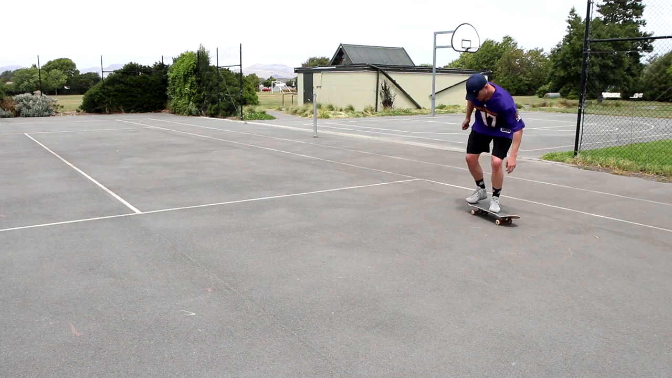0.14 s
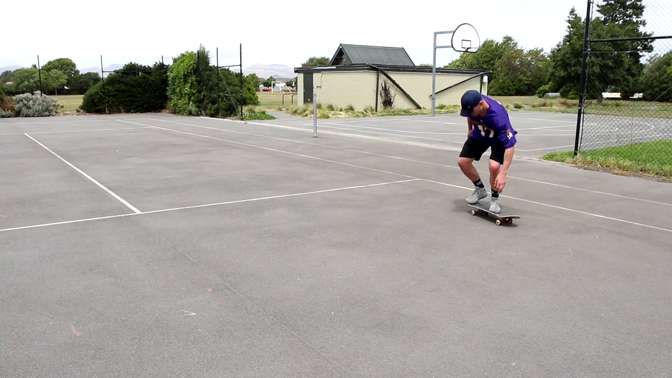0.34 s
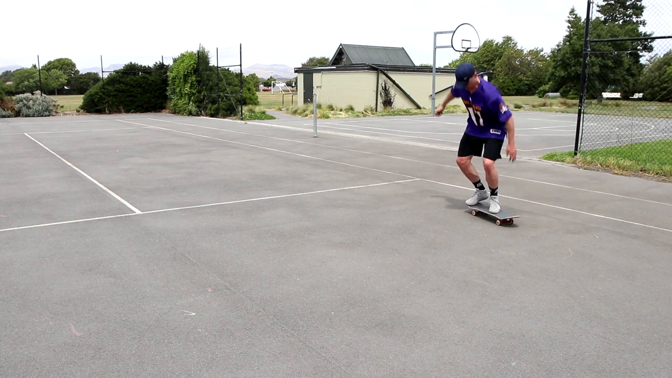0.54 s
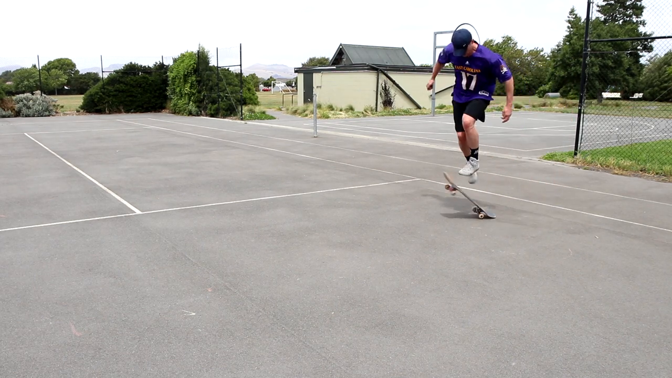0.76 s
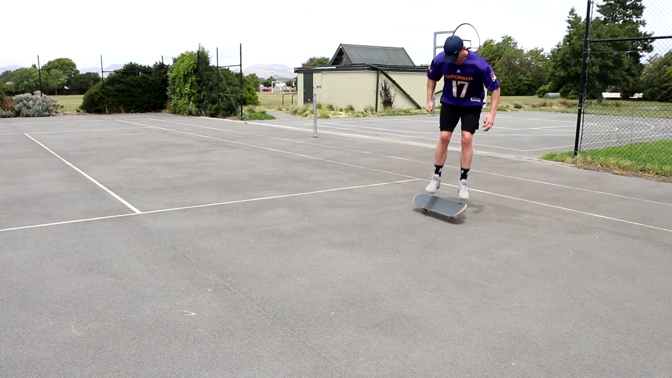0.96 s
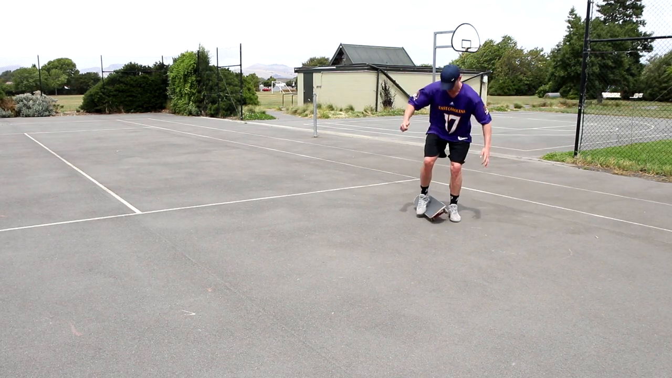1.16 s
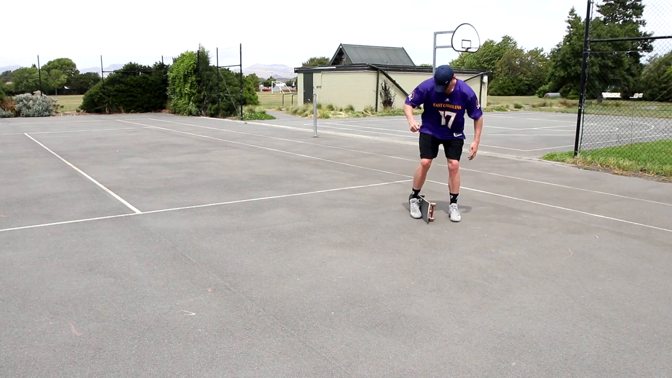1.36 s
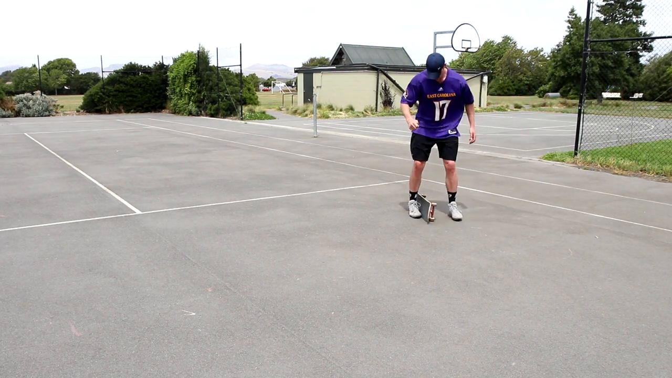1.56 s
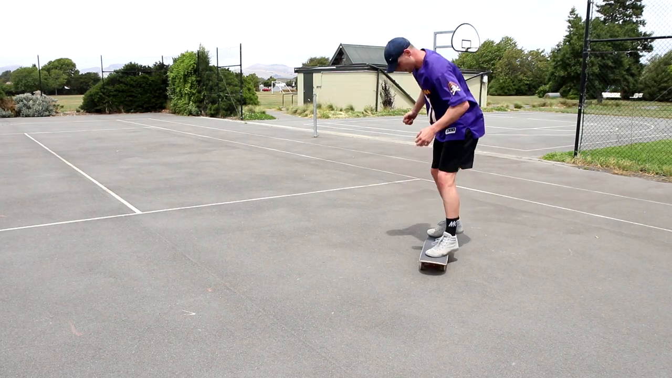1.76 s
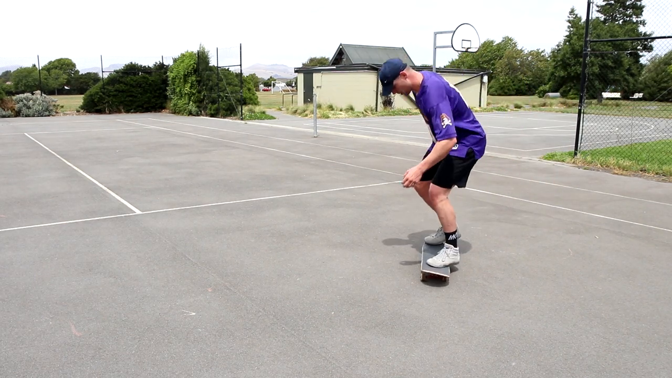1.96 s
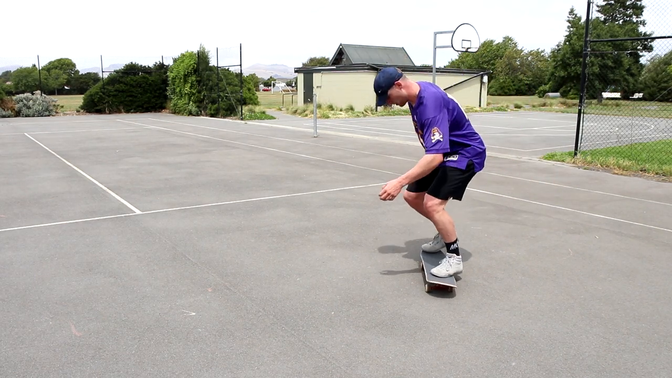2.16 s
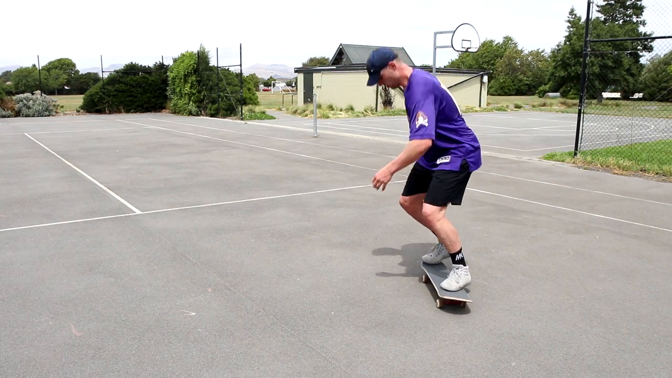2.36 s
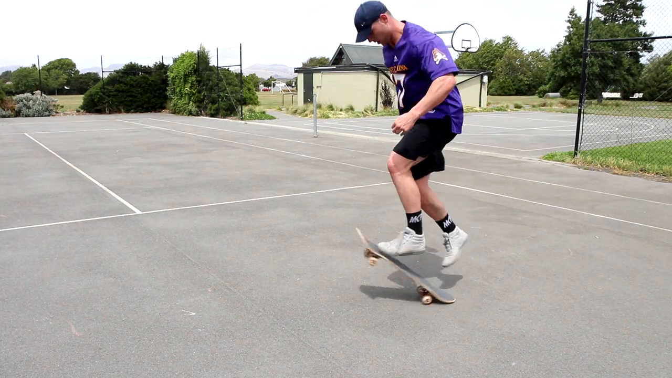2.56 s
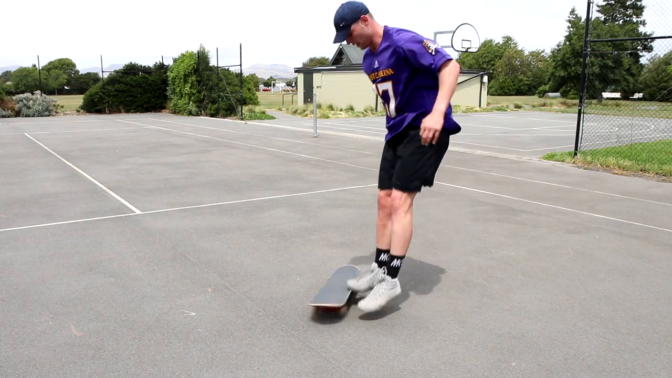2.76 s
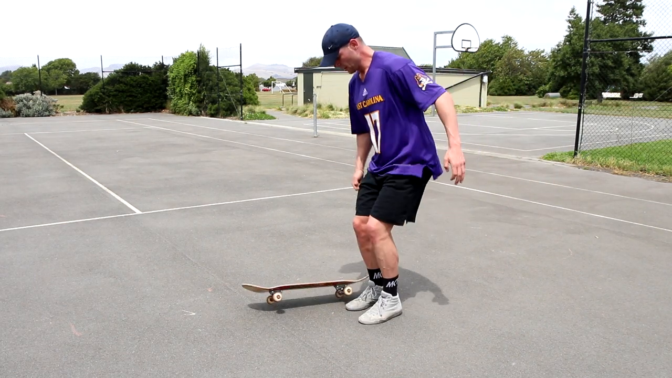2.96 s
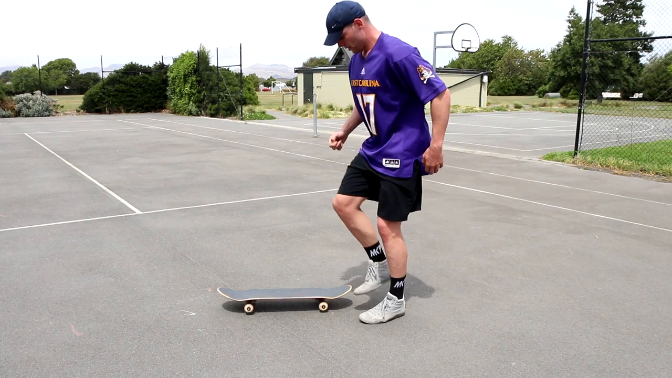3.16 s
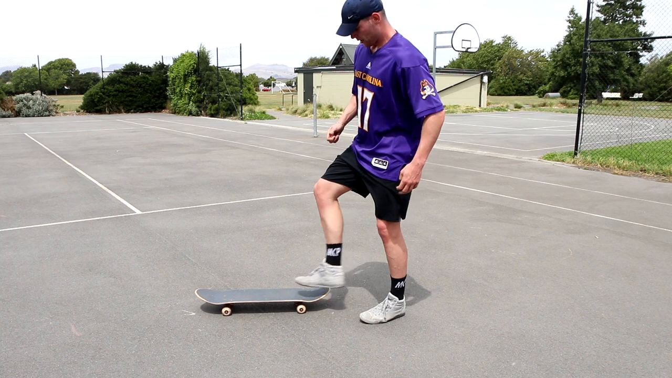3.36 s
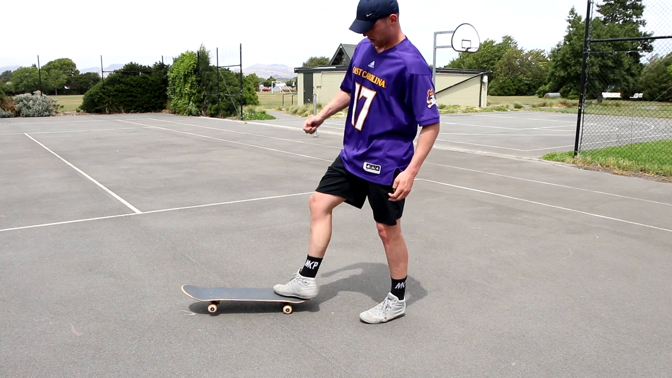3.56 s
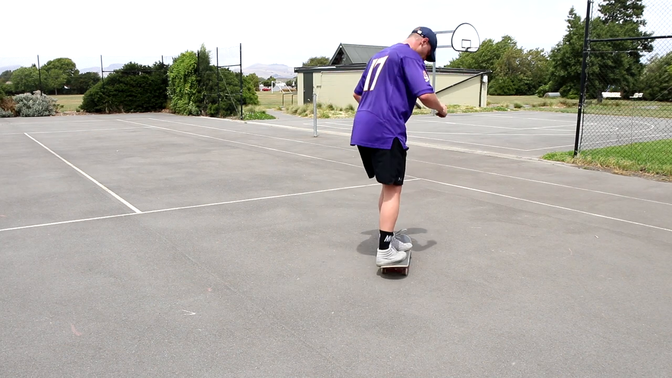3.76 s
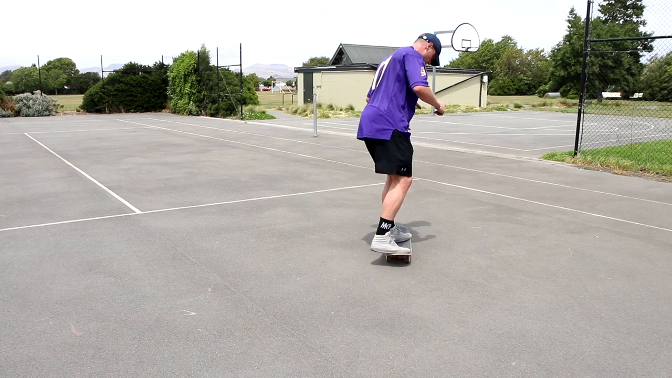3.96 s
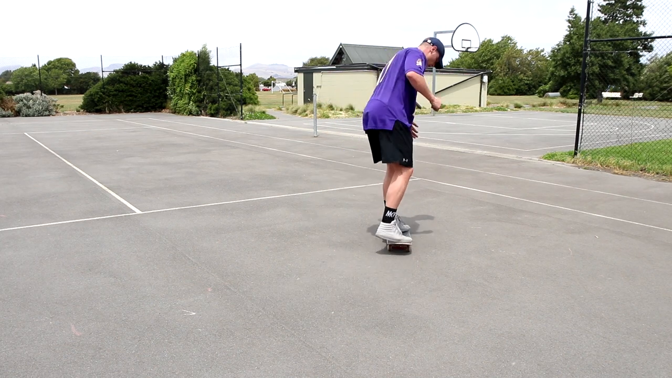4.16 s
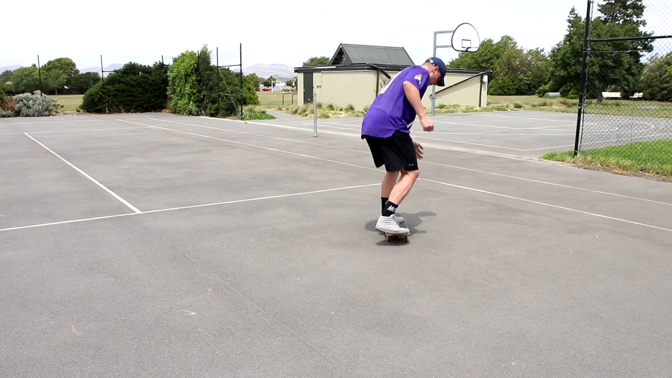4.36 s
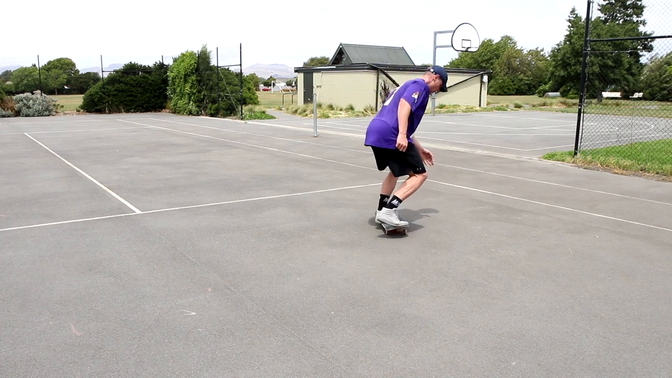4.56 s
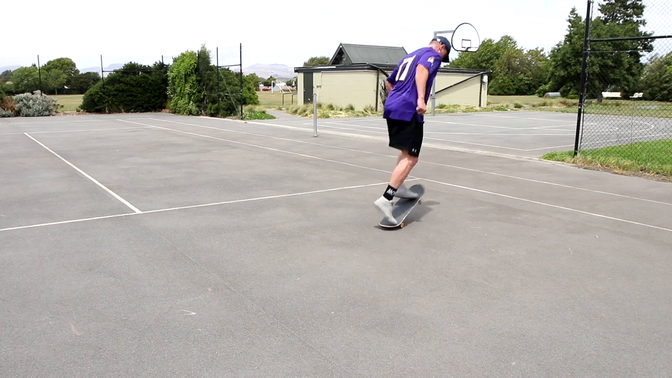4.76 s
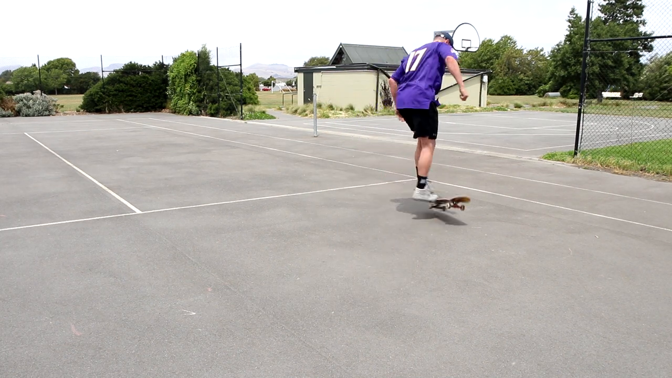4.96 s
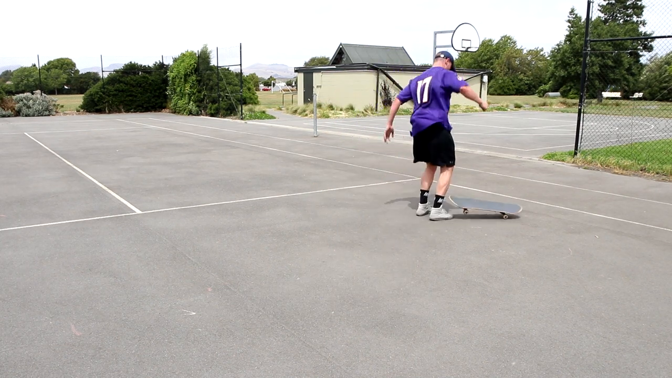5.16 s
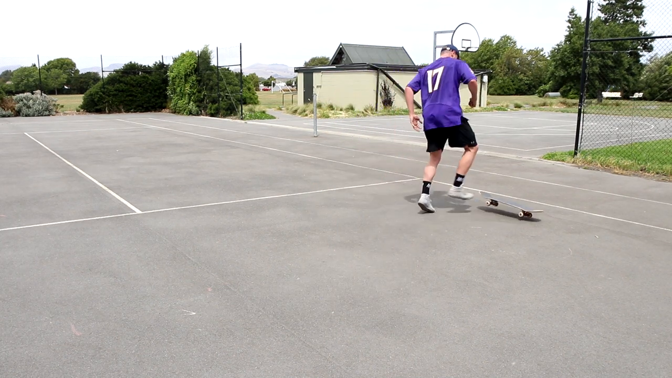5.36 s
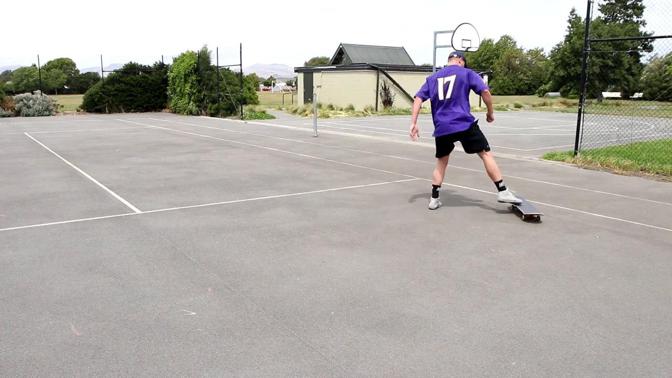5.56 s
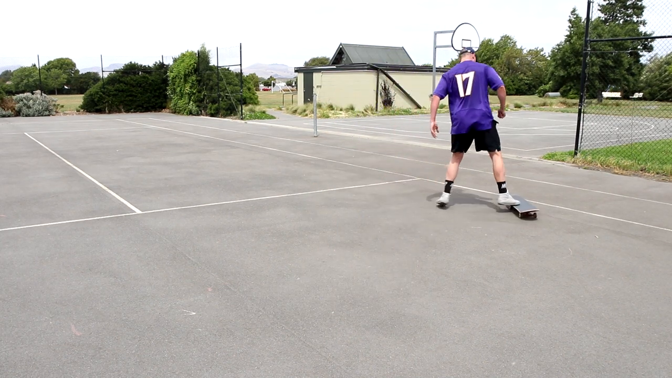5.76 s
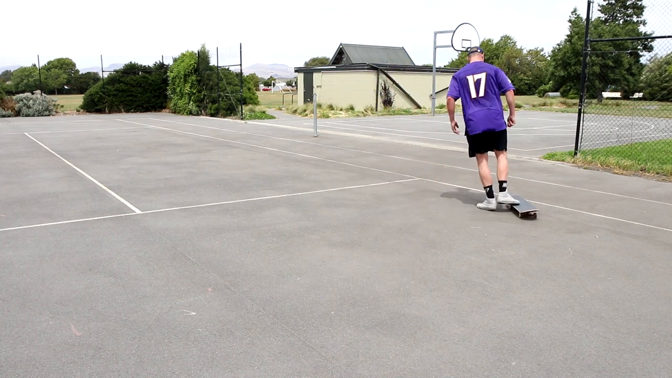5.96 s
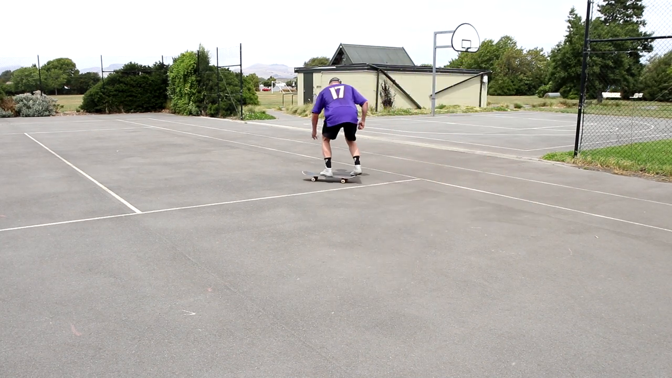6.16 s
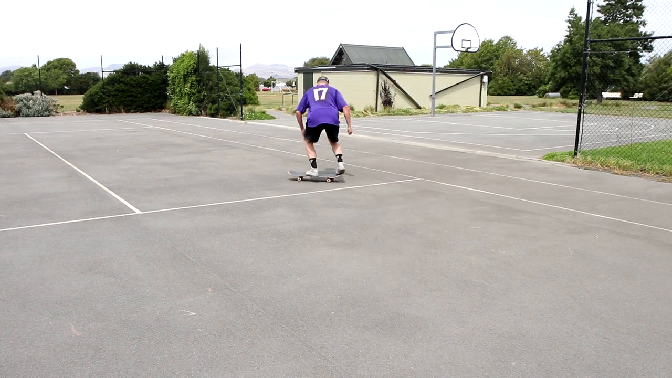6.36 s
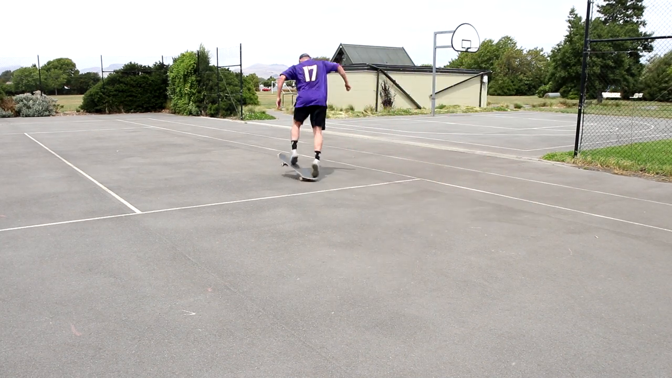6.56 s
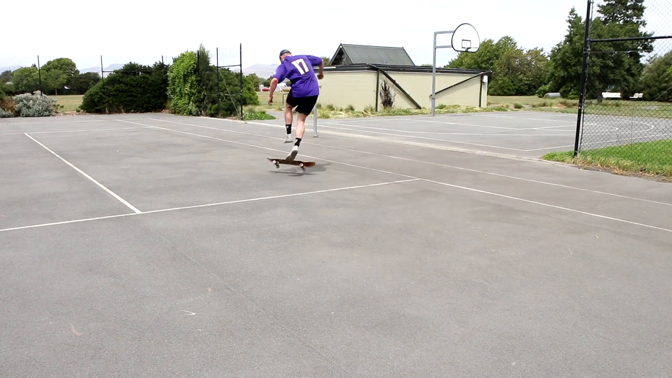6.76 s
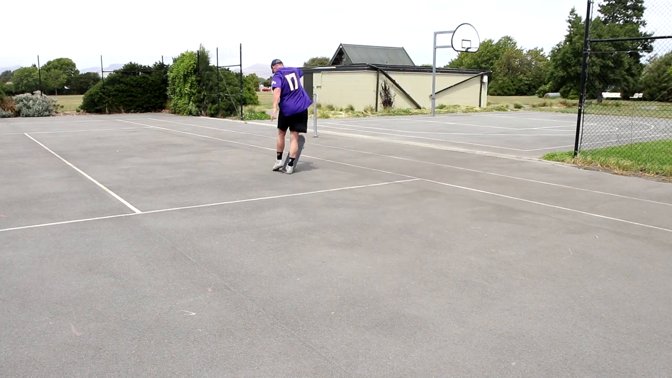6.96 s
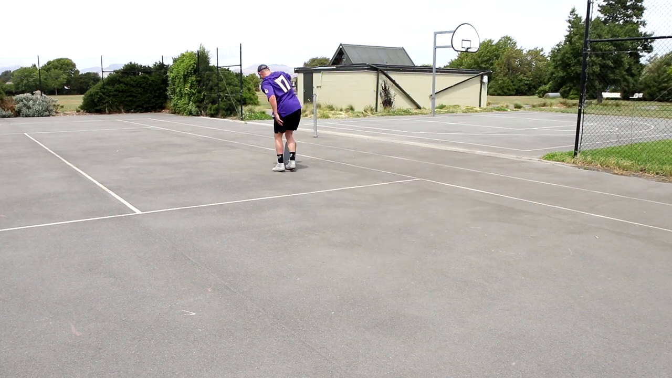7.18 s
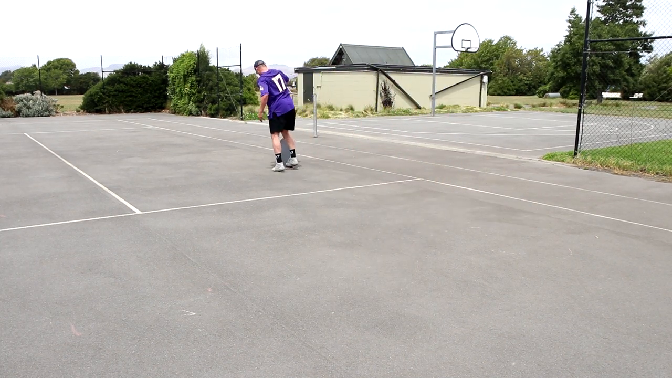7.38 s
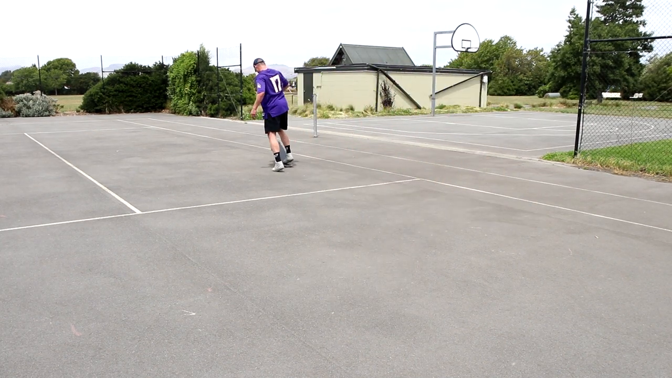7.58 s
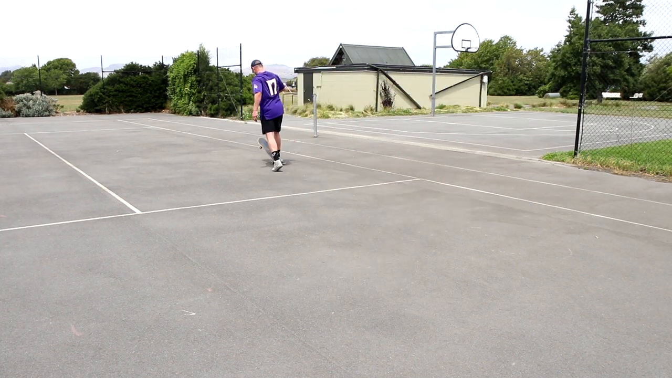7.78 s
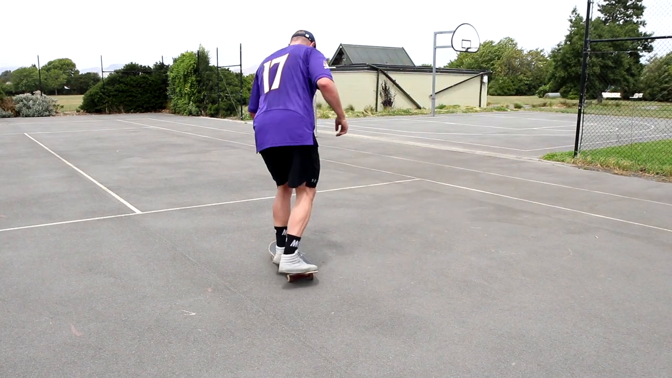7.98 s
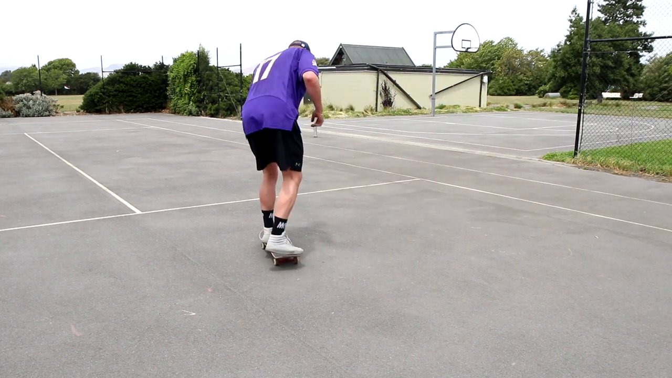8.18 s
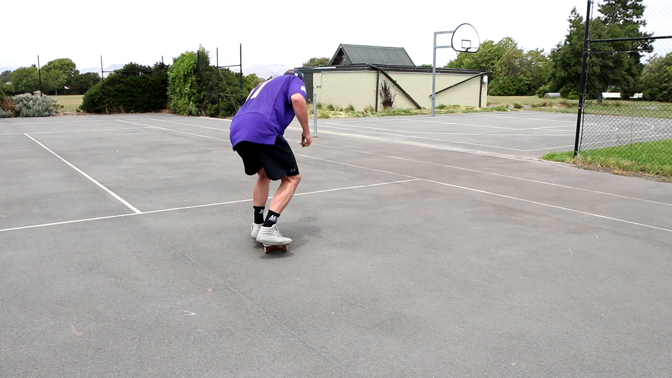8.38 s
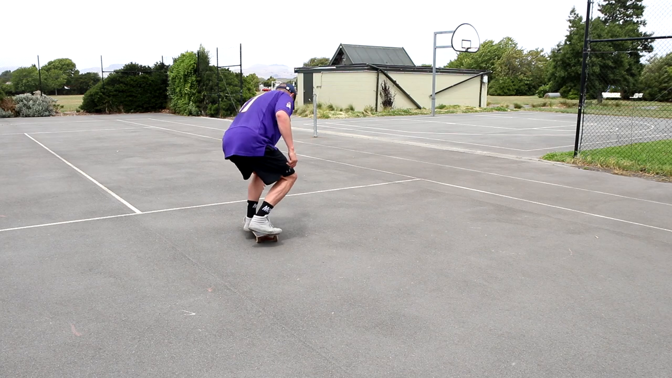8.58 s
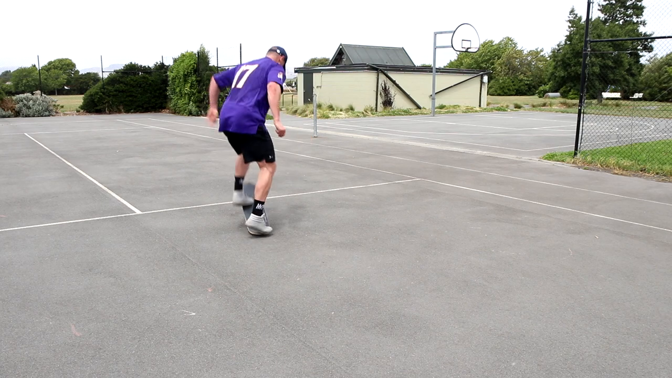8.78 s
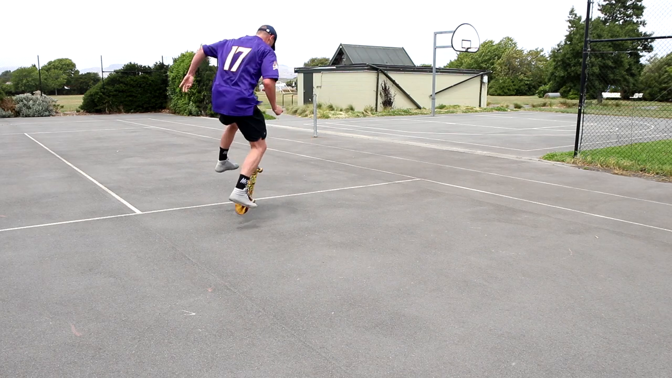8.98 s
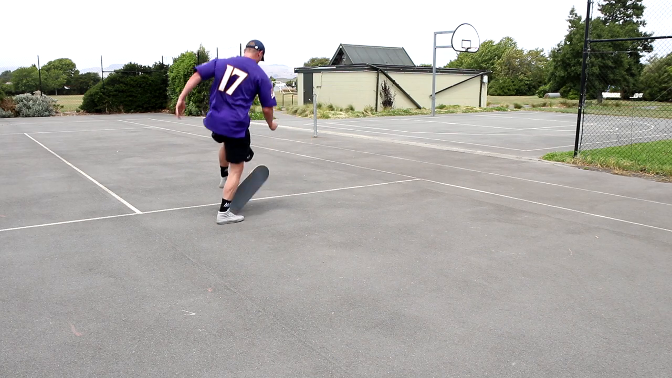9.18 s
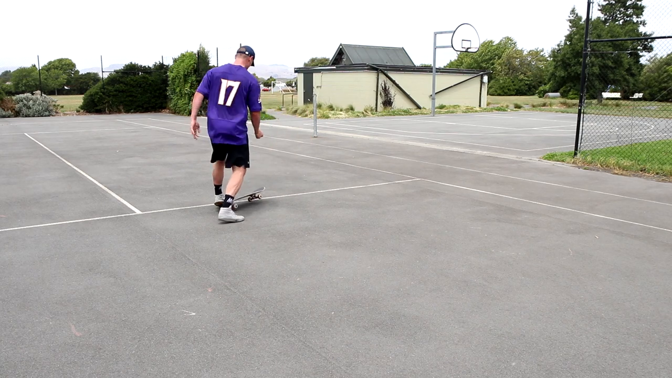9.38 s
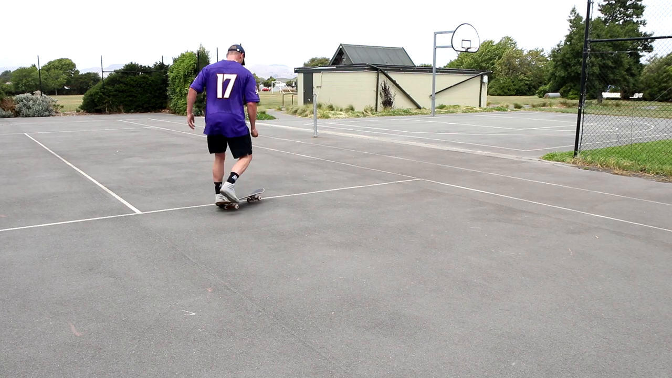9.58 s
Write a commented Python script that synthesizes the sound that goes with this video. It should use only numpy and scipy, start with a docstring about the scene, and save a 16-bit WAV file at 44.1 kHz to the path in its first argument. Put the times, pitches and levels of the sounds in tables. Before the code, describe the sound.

Outdoor asphalt court, one mono microphone, nearly dry, with soft hedge rustle and low wind thumps. Faint rolling opens; scuffs lead to a loud wooden pop at 0.8 seconds, then a cluster of slaps at 0.9-1.2 and juddering wheels to 1.5. After a tiny dip at 1.7, wheels rumble and scrape through gusts; a hard pop at 2.8, clattering landing at 3.0-3.3, and a thin bearing whirr at 3.5. From 3.8 quieter rolling under strong, fluttering wind that briefly hums near 4.6; crack at 5.1, slaps at 5.3, judder at 5.6. From 6.1 rolling resumes, with a very loud pop at 6.9, rapid clacks to 7.3, a scuff at 7.4 and a faint falling bird whistle at 7.6. From 7.8 the fullest wheel rumble, stone snaps at 8.0 and 8.2, a pop at 8.9, slaps at 9.2-9.4 and a last clack at 9.6.

```python
"""On an open asphalt court, a skateboarder tries five kickflips, with short dips in level between attempts.
The board's blows ring the wood; its wheels are a drumming and a hiss, with grit ticks and a spinning bearing.
Shoes and deck scrape, small stones snap and a far bird whistles once, with a faint echo from the court.
Hedges rustle as shaped noise. Gusts buffet the single microphone, which overloads on the hardest blows."""
import sys
import numpy as np
from scipy import signal
from scipy.fft import rfft, irfft, next_fast_len
from scipy.io import wavfile
from scipy.ndimage import map_coordinates

SR = 44100
rng = np.random.default_rng(int(sys.argv[2]) if len(sys.argv) > 2 else 0)


def unload_audio(sound):
    """Save the sound as a 16-bit wav file, at the path given as the first command line argument."""
    columns = np.transpose(np.atleast_2d(sound))
    # keep every value between -1 and 1, then stretch to whole-number steps
    steps = np.round(np.clip(columns, -1, 1) * 32767)
    wavfile.write(sys.argv[1], SR, steps.astype(np.int16))


N = 424683  # length in samples

# A tip or edge of the board clacks on the asphalt. Each row: time in seconds, level in dB,
# ring centre in Hz, wooden knock in dB, hard crack in dB (knock and crack are relative).
CLACKS = [(0.089, -21, 1490, -12, -9.5), (0.809, -4.5, 1950, -16.5, -11), (1.066, -19.5, 2500, -20, -23),
          (2.82, -2.5, 1610, -27, -24), (2.847, -3.5, 1230, -46, -17.5), (3.106, -9, 1860, -12.5, -13.5),
          (3.142, -4.5, 1460, -22, -6.5), (3.21, -12, 1340, -12, -5), (3.344, -20.5, 1400, -26, -2),
          (5.103, -3.5, 930, -35, -5.5), (5.158, -8, 790, -15, -8), (6.871, 0, 814, -7, -16.5),
          (7.026, -2.5, 1900, -16.5, -7.5), (7.126, -6.5, 2270, -31, -34), (7.18, -14, 3700, -12, -39),
          (8.875, -4, 1700, -5, -9), (9.56, -7.5, 1050, -37, -14.5)]
CLACK_T60 = 0.026  # seconds for the chatter to fall 60 dB
# The board slaps down flat. Each row: time in seconds, level in dB, hard crack in relative dB.
SLAPS = [(0.933, -15.5, -8.5), (1.008, -4, -15), (1.107, -4, -6), (1.17, -11.5, -13.5), (2.987, -9, -9),
         (5.329, -9, -10.5), (5.368, -12.5, -1), (6.966, -6.5, -17.5), (7.09, -10, -23), (7.269, -9, -23.5),
         (9.197, -17, -11), (9.269, -3, -16.5), (9.364, -5.5, -1.5)]
SLAP_KNOCK_DB, SLAP_T60, SLAP_HZ = -2, 0.047, 1245  # relative dB, seconds, ring centre in Hz
# Wheels and trucks judder over the ground. Each row: time in seconds, level in dB, ring centre in Hz.
JUDDERS = [(1.127, -10, 765), (1.391, -9, 900), (1.456, -8.5, 1170), (1.492, -9.5, 1260),
           (2.786, -13, 1960), (2.799, 2, 1510), (2.876, -16.5, 1570), (3.16, -5, 2020), (3.271, -5, 2220),
           (3.309, -18, 1800), (4.267, -21.5, 1600), (4.319, -20, 1800), (4.341, -15, 1700),
           (5.624, -2.5, 1370), (5.652, -8.5, 1500), (5.701, -14.5, 1560), (5.73, -20, 1590),
           (6.641, -7.5, 1060), (7.499, -12, 915), (8.304, -10.5, 1430), (8.775, -8, 1340),
           (9.608, -17, 1480)]
JUDDER_KNOCK_DB, JUDDER_CRACK_DB, JUDDER_T60 = -16.5, -18.5, 0.081  # relative dB twice, seconds


def contacts():
    """List every blow as (seconds, level dB, knock dB, crack dB, chatter t60 seconds, ring centre Hz)."""
    clacks = [(s, db, knock, crack, CLACK_T60, hz) for s, db, hz, knock, crack in CLACKS]
    slaps = [(s, db, SLAP_KNOCK_DB, crack, SLAP_T60, SLAP_HZ) for s, db, crack in SLAPS]
    judders = [(s, db, JUDDER_KNOCK_DB, JUDDER_CRACK_DB, JUDDER_T60, hz) for s, db, hz in JUDDERS]
    return clacks + slaps + judders


# Ringing tones of the maple deck and metal trucks. Each row: pitch in Hz, width in Hz, relative level in dB.
DECK_MODES = [(340, 45, 1), (500, 55, 2), (870, 85, 0), (1170, 85, 1), (1500, 95, 3), (2030, 120, 0),
              (3450, 280, -3), (5450, 650, -8)]
# The broad slap of wood on asphalt. Each row: frequency in Hz, relative level in dB.
CONTACT = [(200, -1), (1600, 3), (5800, -5), (7500, -14), (15500, -22)]


def deck(force, scatter_db, detune, slap):
    """A broad slap plus the board's modes, whose strengths and pitches shift with contact point and load."""
    chance = rng.standard_normal((len(DECK_MODES), 2))
    modes = []
    for (hz, width, db), (louder, sharper) in zip(DECK_MODES, chance):
        modes.append((hz * (1 + detune * sharper), width, db + scatter_db * louder))
    return filtered(force, lambda f: resonances(modes, f) + slap * amp(along(CONTACT, f)))


def blows(body_db=-9, knock_db=-6, crack_db=-5, spike=7, bite=0.0021, rattle_db=-22, rattle_t60=0.23):
    """Each blow builds to a hard contact in bite seconds, chatters briefly and leaves the trucks rattling."""
    out, t = np.zeros(N + SR), np.arange(SR // 4) / SR

    def sized(x):
        """Give every blow the same energy."""
        return x / np.sqrt(np.sum(x ** 2) / (SR * 0.012))

    for s, db, knock, crack, t60, centre_hz in contacts():
        chatter = np.minimum(t / bite, 1) ** 2 * amp(-60 * np.maximum(t - bite, 0) / t60)
        # loose washers and wheels rattle in uneven clumps
        clumps = amp(5 * map_coordinates(rng.standard_normal(100), [t * 200], mode="mirror"))
        rattle = clumps * amp(rattle_db - 60 * t / rattle_t60)
        force = rng.standard_normal(len(t)) * (chatter + rattle)
        force[round(bite * SR)] += spike  # the hard contact itself
        ring = deck(force, scatter_db=2.5, detune=0.055, slap=0.45)
        # flat wood knocks low, metal and edges crack high
        body = amp(body_db) * sized(band(ring, [centre_hz / 2.06, centre_hz * 1.41], "bandpass"))
        low = amp(knock + knock_db) * sized(band(ring, [200, 650], "bandpass"))
        high = amp(crack + crack_db) * sized(band(ring, 1220, "highpass"))
        out[round(s * SR):][:len(t)] += amp(db) * (body - low - high)
    return out[:N]


# Wheels on the ground. Each row: start in seconds, end in seconds, drumming in dB, hiss in dB.
ROLLS = [(0, 0.797, -48, -50.5), (1.067, 1.57, -35, -42.5), (1.72, 2.623, -37, -44),
         (3.017, 3.783, -39, -43.5), (3.81, 4.857, -44, -53), (5.143, 5.71, -40, -49.5),
         (6.112, 6.63, -38, -42), (6.97, 7.804, -40.5, -66), (7.876, 8.904, -30.5, -41.5),
         (9.228, 9.63, -36, -44)]
# How fast the level falls through friction, rises at touchdown, and falls on leaving the ground.
SLOWING_DB_PER_S, TOUCH_DB_PER_S, LIFT_DB_PER_S = 3.5, 388, 89
# Ringing tones of the ridden board. Each row: pitch in Hz, width in Hz, relative level in dB.
WHEEL_MODES = [(297, 90, 2), (533, 80, 0), (907, 1200, 3), (1395, 100, 3.5)]
# Colour of the rolling hiss. Each row: frequency in Hz, relative level in dB per Hz.
GRIT = [(1200, -17), (2600, -2.5), (3480, 8), (4300, -1), (5500, 3.5), (7500, -11), (11000, -9),
        (15500, -15)]


def wheels(roll_db=0, grit_db=-2):
    """Wheels drum over the asphalt's grain, fading as they slow; grit and bearings hiss with scattered ticks."""
    t, roll, hiss = np.arange(N) / SR, 0, 0
    for start, end, drum_db, hiss_db in ROLLS:
        speed = swell(start, end, TOUCH_DB_PER_S, LIFT_DB_PER_S) * amp(-SLOWING_DB_PER_S * (t - start))
        roll = roll + amp(drum_db) * speed
        hiss = hiss + amp(hiss_db) * speed
    surface = wobble(28)
    bumps = grains(rate=2500, spread_db=4.5)
    drum = unit(filtered(bumps, lambda f: resonances(WHEEL_MODES, f) / (1 + (f / 2200) ** 4)))
    # fast rolling under the rider's weight fills out the low notes
    drum = drum + 30 * roll * band(drum, [230, 650], "bandpass")
    crackle = rng.standard_normal(N) * (1 + 0.6 * bursts(rate=13, life=0.002))
    drumming = roll * amp(roll_db + 2.76 * surface) * drum
    hissing = hiss * amp(grit_db + 1.7 * surface) * coloured(crackle, GRIT)
    return drumming + hissing


# Colour of the grit ticks. Each row: frequency in Hz, relative level in dB per Hz.
SPECKS = [(600, -13), (1500, 21), (5500, 21.5), (7500, 7), (11000, 15.5), (15500, -7.5)]


def ticks(level_db=-8, rate=110, life=0.00091):
    """Specks of grit crack under the rolling wheels: noise in short random bursts, rate a second."""
    load = 0
    for start, end, _, hiss_db in ROLLS:
        load = load + amp(hiss_db) * swell(start, end, TOUCH_DB_PER_S, LIFT_DB_PER_S)
    return amp(level_db) * load * coloured(rng.standard_normal(N) * bursts(rate, life), SPECKS)


# A loose wheel spins on in the air: start in seconds, end in seconds, level in dB.
SPIN = (3.5, 3.76, -41.5)
# The whirr of its bearing. Each row: pitch in Hz, width in Hz, relative level in dB.
BEARING_MODES = [(1306, 44, -2.5), (2430, 110, -14), (3430, 77, -11.5)]


def bearing():
    """A free wheel whirrs as noise through its bearing's resonances, fading as it runs down."""
    start, end, db = SPIN
    slowing = amp(-SLOWING_DB_PER_S * (np.arange(N) / SR - start))
    speed = swell(start, end, TOUCH_DB_PER_S, LIFT_DB_PER_S) * slowing
    whirr = unit(filtered(rng.standard_normal(N), lambda f: resonances(BEARING_MODES, f)))
    return amp(db) * speed * whirr


# Soles and deck scraping on asphalt and grip tape.
# Each row: start in seconds, length in seconds, level in dB, gritty rasp in dB relative to the rub.
SCRAPES = [(0.608, 0.076, -32.5, -1), (0.709, 0.05, -32, -10.5), (1.758, 0.1, -30, -28),
           (1.902, 0.065, -30, -12), (2.41, 0.085, -31, -10), (2.521, 0.069, -27.5, -5),
           (2.656, 0.23, -40, -7), (3.254, 0.069, -32.5, -3), (4.191, 0.026, -38, -4.5),
           (4.796, 0.071, -41, -10), (5.957, 0.025, -37, -2.5), (6.498, 0.13, -33, -4),
           (6.948, 0.028, -26, -11), (7.043, 0.2, -30.5, -6.5), (7.41, 0.085, -22.5, -20.5),
           (8.705, 0.052, -24, -13), (8.924, 0.033, -31.5, -4.5), (9.101, 0.12, -33, -14)]
SCRAPE_ATTACK_DB_PER_S, SCRAPE_RELEASE_DB_PER_S = 1505, 636
# Colour of the rub. Each row: frequency in Hz, relative level in dB per Hz.
SOLE = [(250, 5), (1400, 9), (4000, -5), (5800, -34), (7500, -36), (15500, -32)]
# Colour of the grit rasping under it. Each row: frequency in Hz, relative level in dB per Hz.
RASP = [(1200, -19), (2600, -2), (3480, 4.5), (4300, -2.5), (5500, 0), (7500, -19.5), (15500, -16.5)]


def scrapes(level_db=-1, rasp_db=-1, uneven_db=3):
    """A sliding sole or deck presses unevenly, catching and slipping on many small points; grit rasps."""
    rub, rasp = 0, 0
    for s, length, db, grit_db in SCRAPES:
        pressure = amp(db) * swell(s, s + length, SCRAPE_ATTACK_DB_PER_S, SCRAPE_RELEASE_DB_PER_S)
        rub = rub + pressure
        rasp = rasp + amp(grit_db) * pressure

    def slips():
        """Noise with many sudden catches."""
        return rng.standard_normal(N) * (0.9 + bursts(rate=150, life=0.003))

    rubbing = rub * coloured(slips(), SOLE)
    rasping = amp(rasp_db) * rasp * coloured(slips(), RASP)
    return amp(level_db + uneven_db * wobble(55)) * (rubbing + rasping)


# Small stones snapping under wheels and shoes. Each row: time in seconds, relative level in dB.
STONES = [(2.324, -26), (3.556, -17), (4.347, -21.5), (5.502, -16.5), (5.576, -11.5), (7.9986, -8.5),
          (8.195, -11)]


def stones(level_db=-5, t60=0.034):
    """A stone gives a short dry snap: noise that falls 60 dB in t60 seconds."""
    out, t = np.zeros(N + SR), np.arange(SR // 10) / SR
    for s, db in STONES:
        out[round(s * SR):][:len(t)] += amp(db + level_db - 60 * t / t60) * rng.standard_normal(len(t))
    return band(out[:N], [1400, 6500], "bandpass")


# The bird's two falling notes. Each row: time in seconds, pitch in Hz, level in dB.
BIRD = [(7.61, 5000, -69), (7.645, 3730, -40), (7.67, 3670, -58), (7.69, 4050, -49), (7.76, 3430, -48)]


def bird():
    """A thin distant whistle: one sine gliding through the listed pitches and levels."""
    hz, db = curves(BIRD)
    t = np.arange(N) / SR
    singing = (t > BIRD[0][0]) * (t < BIRD[-1][0])
    return singing * amp(db) * np.sin(2 * np.pi * np.cumsum(hz) / SR)


# How long the court's echo lasts. Each row: frequency in Hz, time to fall 60 dB in seconds.
COURT = [(200, 0.07), (1500, 0.21), (12000, 0.11)]


def court(x):
    """Fence, shed and hedges scatter a thin tail back, 20 ms late: noise fading at its own pace per pitch."""
    hz, t, z = signal.stft(rng.standard_normal(SR // 2), SR, nperseg=256)
    fading = amp(-60 * t / along(COURT, hz)[:, None])
    tail = signal.istft(z * fading, SR, nperseg=256)[1]
    late = np.pad(x, (round(0.02 * SR), 0))
    return signal.fftconvolve(late, tail / np.linalg.norm(tail))[:N]


# The air during each attempt.
# Each row: start in seconds, breeze on the microphone in dB, rustle of the hedges in dB (both relative).
ATTEMPTS = [(0, -42, -42.5), (1.72, -32, -50), (3.8, -25.5, -50), (6.08, -25.5, -44.5), (7.84, -31, -39)]


def air():
    """Breeze and rustle gains, steady through each attempt."""
    starts, *levels = np.transpose(ATTEMPTS)
    attempt = np.searchsorted(starts[1:], np.arange(N) / SR)
    return amp(levels)[:, attempt]


# Colour of the leaves. Each row: frequency in Hz, relative level in dB per Hz.
HEDGES = [(180, -23), (300, -10), (550, 4.5), (1000, -1), (1600, -0.5), (2280, -7.5), (3690, -7.5),
          (15500, -30)]


def hedges(level_db=-1):
    """Leaves around the court rustle evenly, as steady shaped noise."""
    return amp(level_db) * air()[1] * coloured(rng.standard_normal(N), HEDGES)


# Gusts on the microphone.
# Each row: start in seconds, end in seconds, rumble in dB, flutter in dB (both relative).
GUSTS = [(0, 0.264, -26, -43.5), (0.646, 1.026, -23, -44), (1.31, 1.7, -16.5, -36),
         (1.74, 1.878, -15.5, -24), (1.997, 2.42, -14, -25), (2.634, 2.782, -19.5, -28.5),
         (3.49, 3.783, -24.5, -48), (3.817, 4.41, -14, -24.5), (4.45, 4.76, -14.5, -22),
         (4.77, 5.052, -16.5, -25), (5.85, 5.892, -14.5, -23.5), (6.1, 6.892, -22, -39),
         (7.502, 7.662, -19, -31), (7.712, 7.83, -13.5, -32), (8.673, 9.107, -19.5, -35.5)]
GUST_RISE_DB_PER_S, GUST_FALL_DB_PER_S = 50, 143
BREEZE_FLUTTER_DB = -13  # relative to the breeze's rumble
# Colour of the low rumble. Each row: frequency in Hz, relative level in dB per Hz.
RUMBLE = [(12, -3.5), (35, 0.5), (70, 1.5), (110, -3.5), (155, -14.5), (260, -77), (500, -93)]
# Colour of the higher flutter. Each row: frequency in Hz, relative level in dB per Hz.
FLUTTER = [(50, -52), (125, 4.5), (200, -1.5), (290, -12), (450, -19), (1500, -77)]
# The strongest gust hums across the port: start in seconds, end in seconds.
HUM = (4.53, 4.66)


def wind(rumble_db=1.5, flutter_db=0, hum_db=-17, hum_hz=213):
    """Eddies of breeze and gusts thump on the microphone and flutter higher; the strongest gust also hums."""
    rumble = air()[0]
    flutter = amp(BREEZE_FLUTTER_DB) * rumble
    for start, end, low_db, high_db in GUSTS:
        gust = swell(start, end, GUST_RISE_DB_PER_S, GUST_FALL_DB_PER_S)
        rumble = np.maximum(rumble, amp(low_db) * gust)
        flutter = np.maximum(flutter, amp(high_db) * gust)
    eddies = wobble(16)
    low = rumble * amp(rumble_db + 2.0 * eddies) * coloured(rng.standard_normal(N), RUMBLE)
    uneven = amp(flutter_db + 2.0 * eddies + 2.67 * wobble(45))
    high = flutter * uneven * coloured(rng.standard_normal(N), FLUTTER)
    tone = unit(band(rng.standard_normal(N), [hum_hz - 10, hum_hz + 10], "bandpass"))
    hum = swell(*HUM, GUST_RISE_DB_PER_S, GUST_FALL_DB_PER_S) * tone
    # pressure grows faster than speed, so the strongest eddies splutter higher up
    splutter = 2.63 * high * np.abs(high)
    return low + high + splutter + amp(hum_db) * hum


# Moments between one attempt and the next, in seconds.
JOINS = [1.72, 3.8, 6.08, 7.84]


def swell(start, end, rise_db_per_s, fall_db_per_s):
    """Attack, hold and release, kept within the attempt in which the sound happens."""
    edges = np.round(np.r_[0, np.array(JOINS) * SR, N]).astype(int)
    attempt = np.searchsorted(JOINS, (start + end) / 2)
    span = np.arange(edges[attempt], edges[attempt + 1])
    t, gain = span / SR, np.zeros(N)
    rise = -rise_db_per_s * np.maximum(start - t, 0)
    fall = -fall_db_per_s * np.maximum(t - end, 0)
    gain[span] = amp(rise + fall)
    return gain


def resonances(modes, f):
    """Causal response at frequencies f of modes given as (Hz, width Hz, dB)."""
    return sum(amp(db) * 1j * f * w / (c * c - f * f + 1j * f * w) for c, w, db in modes)


def grains(rate, spread_db):
    """Tiny contacts of uneven size, about rate a second, at rms 1."""
    hits = (rng.random(N) < rate / SR) * rng.choice([-1, 1], N)
    sizes = amp(spread_db * np.clip(rng.standard_normal(N), -2, 2))
    return unit(hits * sizes)


def bursts(rate, life):
    """An envelope of rms 1: sudden catches at random moments, each falling to about a third in life seconds."""
    catches = np.abs(grains(rate, spread_db=5))
    return unit(signal.lfilter([1], [1, -np.exp(-1 / (life * SR))], catches))


def wobble(rate):
    """A smooth random curve, rate knots a second."""
    return map_coordinates(rng.standard_normal(int(N * rate / SR) + 4), [np.arange(N) * rate / SR])


def curves(rows):
    """One value per sample for each column after the time."""
    s, *cols = np.transpose(rows)
    return [np.interp(np.arange(N) / SR, s, c) for c in cols]


def coloured(x, spectrum):
    """x shaped by the given (Hz, dB) spectrum, at rms 1."""
    return unit(filtered(x, lambda hz: amp(along(spectrum, hz))))


def filtered(x, response):
    """x times a response of frequency, with padding so that tails do not wrap round."""
    m = next_fast_len(len(x) + 8192)
    return irfft(rfft(x, m) * response(np.fft.rfftfreq(m, 1 / SR)), m)[:len(x)]


def band(x, edge_hz, kind):
    """A causal second-order Butterworth filter design."""
    return signal.sosfilt(signal.butter(2, edge_hz, kind, fs=SR, output="sos"), x)


def along(points, hz):
    """Read (Hz, value) points at the given frequencies, on a log axis."""
    f, v = np.transpose(points)
    return np.interp(np.log(hz + 1), np.log(f + 1), v)


def unit(x):
    """Scale to rms 1."""
    return x / np.sqrt(np.mean(x ** 2) + 1e-20)


def amp(db):
    """Decibels to gain."""
    return 10 ** (np.asarray(db) / 20)


def scene():
    """Board, shoes, stones and bird with the court's echo, then hedges and wind at the microphone."""
    sounds = blows() + wheels() + ticks() + bearing() + scrapes() + stones() + bird()
    return (sounds + amp(-25.0) * court(sounds) + hedges() + wind())[None]


TOP_HZ = 15900  # nothing is heard above this


def record(dry, fade_db=-42):
    """The level dips between attempts, loud peaks are rounded off by overload, and the treble ends steeply."""
    t = np.arange(N) / SR
    dip = sum(np.interp(t - s, [-0.029, -0.027, 0.012, 0.021], [0, 1, 1, 0]) for s in JOINS)
    x = dry[0] * amp(fade_db * dip)
    x = x / (1 + np.abs(x) ** 8) ** (1 / 8)  # overload: bends smoothly towards full scale
    return filtered(x, lambda hz: hz < TOP_HZ)[None]


dry = scene()
out = record(dry)
unload_audio(out)
```